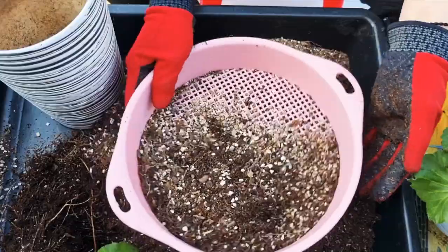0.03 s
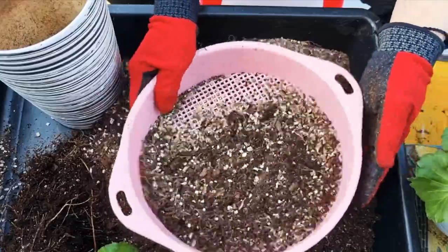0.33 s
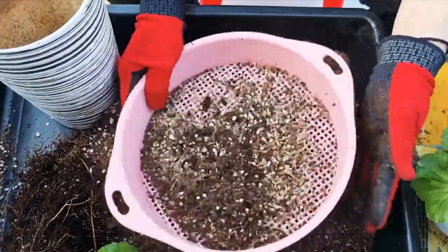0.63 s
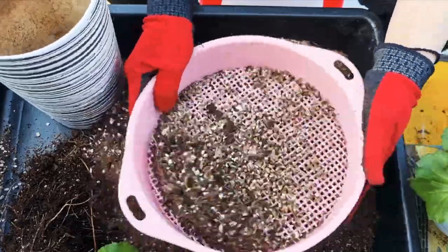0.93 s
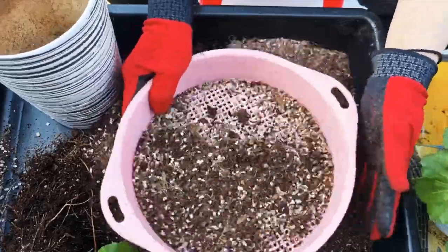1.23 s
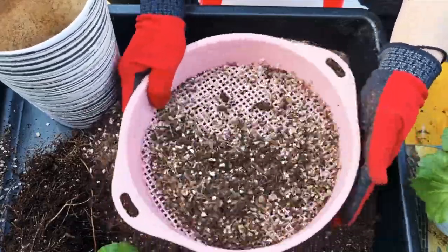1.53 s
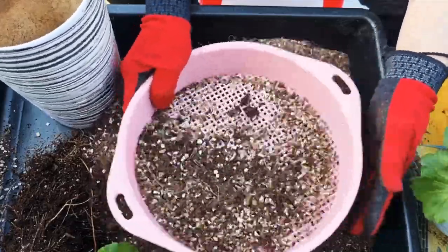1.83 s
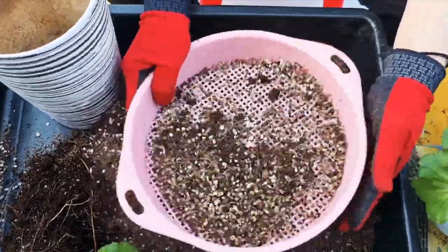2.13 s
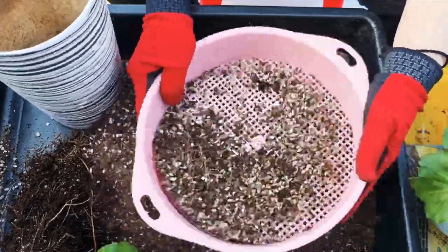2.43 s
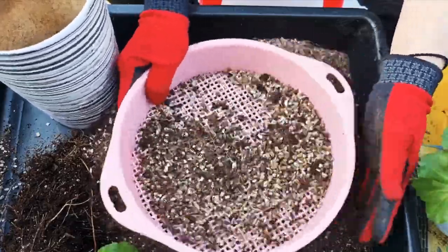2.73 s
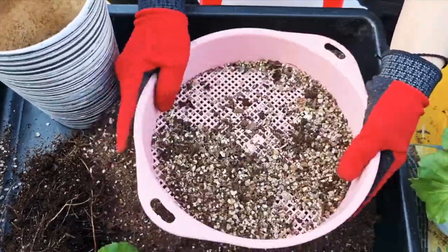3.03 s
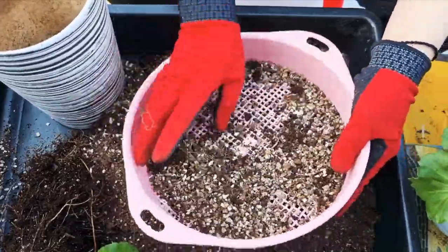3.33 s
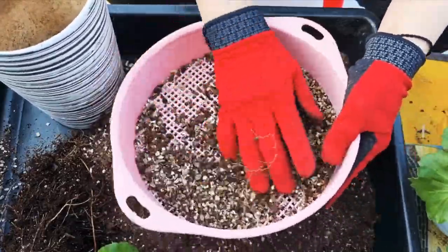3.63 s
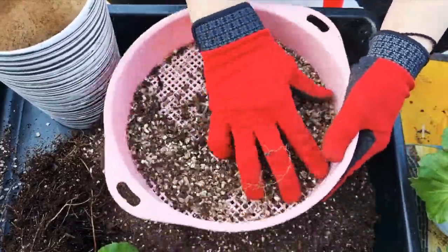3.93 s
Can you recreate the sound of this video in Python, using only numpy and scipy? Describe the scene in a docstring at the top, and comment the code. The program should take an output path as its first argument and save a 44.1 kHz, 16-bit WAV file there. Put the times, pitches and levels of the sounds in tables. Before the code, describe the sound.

Gritty soil rattles and hisses in a plastic sieve, shaken close by in rapid pulses with sharp ticks and soft knocks. The shaking stops and a gloved hand quietly stirs the soil, over a low rumble and distant engine.

```python
"""Sieving gritty soil

Potting soil is shaken in a plastic sieve over a tray, close by. Each stroke throws grit across the mesh
in surges of tiny impacts that excite the modes of the plastic, and the sieve knocks softly in the hands.
The shaking stops and a gloved hand stirs the soil; a distant engine drones under low rumble."""
import sys
import numpy as np
from scipy import signal
from scipy.fft import rfft, irfft
from scipy.io import wavfile
from scipy.ndimage import uniform_filter1d

SR = 44100
rng = np.random.default_rng(int(sys.argv[2]) if len(sys.argv) > 2 else 0)


def wav_out(sig):
    """Save sig, one row per channel (or a flat mono array), as 16-bit PCM at SR to the path in sys.argv[1]."""
    wavfile.write(sys.argv[1], SR, np.round(np.clip(np.atleast_2d(sig).T, -1, 1) * 32767).astype(np.int16))


N = 176400

# surges of grit across the mesh (start [s], length [s], level [dB], treble tilt [dB])
GRIT_SURGES = [(.015, 0.048, -54.5, -4), (.138, 0.071, -36.5, -1), (.314, 0.028, -38.5, -0.5),
               (.396, 0.029, -41, -2.5), (.472, 0.059, -37.5, 1), (.562, 0.077, -36.5, 0.5),
               (.664, 0.016, -40, 4), (.758, 0.06, -34.5, 0), (.828, 0.05, -45.5, 3.5),
               (.879, 0.012, -46.5, 5), (.929, 0.05, -36.5, 0.5), (.983, 0.082, -35.5, 1),
               (1.118, 0.073, -35.5, 3.5), (1.236, 0.04, -38, 0), (1.296, .014, -36.5, 1),
               (1.31, 0.017, -32, 2), (1.342, 0.0092, -32.5, 2), (1.42, 0.075, -39, 0),
               (1.493, 0.03, -34, 0.5), (1.543, 0.012, -30, -0.5), (1.603, 0.029, -39.5, 2.5),
               (1.703, .028, -31, 2), (1.743, 0.022, -30, 0.5), (1.793, 0.049, -36.5, 0.5),
               (1.88, 0.053, -34, 0), (1.934, 0.017, -30.5, 1), (2.0, 0.029, -43, -1.5),
               (2.066, .014, -39.5, 4.5), (2.081, 0.021, -32, 3.5), (2.124, 0.02, -28.5, 0),
               (2.188, 0.015, -32.5, 0), (2.214, 0.016, -35.5, 1), (2.264, 0.036, -30, 1.5),
               (2.314, 0.031, -31.5, 0), (2.37, 0.073, -39.5, 2), (2.457, 0.042, -31.5, 2),
               (2.511, 0.021, -29.5, 1), (2.548, 0.08, -37, 0), (2.652, 0.038, -38, 0),
               (2.69, 0.02, -32.5, 0.5), (2.778, 0.073, -48.5, -1), (2.857, 0.043, -30.5, 3.5),
               (2.903, 0.041, -29.5, -0.5), (2.958, 0.064, -45.5, 1)]
# grit trickling between surges (time [s], level [dB])
GRIT_TRICKLE = [(0, -52.5), (.13, -51), (.22, -46), (.28, -48), (.35, -39.5), (.72, -44), (1.1, -37),
                (1.39, -43), (1.68, -42.5), (2.3, -39), (2.68, -39.5), (2.759, -46), (3.0, -41.5),
                (3.08, -61.5), (3.2, -79), (3.901, -67.5), (4, -52)]
# spectrum of coarse grit on the mesh (frequency [Hz], level [dB])
COARSE_SPECTRUM = [(200, -19.5), (600, -19.5), (1000, -12.5), (1600, -8.5), (2000, -6.5), (3100, 0),
                   (3900, -2), (5200, -2.5), (8000, -14.5), (16000, -20)]
# resonances of the plastic sieve (frequency [Hz], width [Hz], gain [dB])
PLASTIC_MODES = [(1339, 98, 8.5), (1510, 80, -1.5), (1870, 160, 6.5), (2057, 176, 4.5), (2345, 130, 5),
                 (2852, 31, 10.5), (3030, 30, 5), (3300, 240, 3.5)]
# spectrum of fine grit (frequency [Hz], level [dB])
FINE_SPECTRUM = [(1000, -26.5), (2500, 1), (4000, -4), (5200, -1), (6800, -1.5), (8000, -0.5), (9600, -1),
                 (11500, 0), (13500, 2), (14500, -0.5), (16000, -5.5)]
# bright bands of fine grit (frequency [Hz], width [Hz], gain [dB])
FINE_BANDS = [(8830, 780, 4), (13100, 300, 0.5)]


def sieving():
    """Impact excitation: coarse grit rings the modes of the sieve; fine grit ticks against itself."""
    trickle = undb(np.interp(seconds(), *np.array(GRIT_TRICKLE).T))
    clumps = undb(0.74 * walk(130))
    coarse_flow, fine_flow = clumps * np.hypot(flow(GRIT_SURGES, attack_s=.006), trickle)
    coarse = grains(coarse_flow, rate_hz=5000, spread_db=1, ring_s=.00008, crowding=.6)
    fine = grains(fine_flow, rate_hz=6000, spread_db=0, ring_s=.00007, crowding=.6)
    rattle = undb(-3) * colour(coarse, COARSE_SPECTRUM, PLASTIC_MODES)
    return rattle + undb(-1.5) * colour(fine, FINE_SPECTRUM, FINE_BANDS)


# single large grains striking the plastic (time [s], level [dB], decay time [s])
GRAIN_STRIKES = [(.152, -41, 0.0013), (.32, -34.5, .0015), (0.785, -31, .001), (1.319, -19.5, 0.0024),
                 (1.546, -22.5, 0.0024), (1.707, -29, 0.0018), (2.087, -29, .003), (2.144, -18.5, .0008),
                 (2.178, -24, .0006), (2.198, -24, .0025), (2.414, -29, .002), (2.522, -21, 0.0018),
                 (2.863, -28.5, 0.0016), (2.947, -18, 0.00058), (3.016, -35.5, 0.00081), (3.232, -56, .001),
                 (3.424, -45, .0015), (3.433, -50, .002), (3.488, -53.5, .001), (3.809, -48, .002),
                 (3.927, -45, .003)]
# spectrum of a strike (frequency [Hz], level [dB])
STRIKE_SPECTRUM = [(300, -33), (1200, -8.5), (2800, 2), (5000, -5), (7000, 4), (9000, 0), (16000, 0)]


def ticks():
    """Impulse response: a large grain delivers a brief broadband snap that rings the plastic."""
    size = 1024
    out = np.zeros((2, N + size))
    for start, db, decay_s in GRAIN_STRIKES:
        i = int(start * SR)
        fade = np.exp(-np.arange(size) / SR / decay_s)
        out[:, i:i + size] += undb(db) * rng.standard_normal((2, size)) * fade
    return colour(out[:, :N], STRIKE_SPECTRUM, PLASTIC_MODES)


# bumps of the sieve in the hands (time [s], level [dB], centre frequency [Hz])
SIEVE_KNOCKS = [(.611, -41, 566), (.719, -41, 384), (.787, -36, 440), (.888, -40, 402), (.98, -39.5, 398),
                (1.11, -35.5, 460), (1.156, -36, 510), (1.172, -38.5, 393), (1.335, -33, 503),
                (1.512, -40, 400), (1.537, -43, 550), (1.638, -46, 450), (1.741, -40.5, 630),
                (1.839, -39, 430), (1.927, -35, 407), (2.084, -39, 450), (2.314, -36, 417),
                (2.505, -38, 650), (2.525, -56, 500), (2.897, -35, 663)]


def knocks():
    """Damped vibration: the loaded sieve bumps as a stroke turns, a hollow tock over a low thud."""
    size, width_oct, tock_decay_s = 4096, 0.76, 0.0057
    thud_hz, thud_decay_s = 123, .011
    out = np.zeros((2, N + size))
    t, f = np.arange(size) / SR, np.arange(1, size // 2 + 2) * SR / size
    for start, db, hz in SIEVE_KNOCKS:
        band = np.exp(-(np.log2(f / hz) / width_oct) ** 2 / 2)
        shared, left, right = irfft(band * np.exp(2j * np.pi * rng.random((3, len(f)))), size)
        fade = np.exp(-t / tock_decay_s) * (1 - np.exp(-t / 0.00025))
        tock = unit((shared + 0.71 * np.array([left, right])) * fade) * np.sqrt(np.mean(fade ** 2))
        detune = np.exp(0.25 * rng.standard_normal())
        thud = np.sin(2 * np.pi * thud_hz * detune * t) * np.exp(-t / thud_decay_s)
        i = int(start * SR)
        out[:, i:i + size] += undb(db) * (tock + undb(-2.5) * thud)
    return out[:, :N]


# strokes of the glove through the soil (start [s], length [s], level [dB], treble tilt [dB])
GLOVE_STROKES = [(3.07, 0.073, -64.5, -4.5), (3.285, 0.035, -56, -4), (3.311, 0.04, -43, -1),
                 (3.34, 0.019, -42.5, 0.5), (3.419, 0.011, -50.5, 0), (3.455, 0.17, -59.5, 2.5),
                 (3.558, 0.038, -52.5, 1.5), (3.61, 0.046, -55, -3), (3.655, .045, -50, 0),
                 (3.745, 0.026, -66, 5), (3.921, 0.049, -48.5, -1.5)]
# spectra of coarse and of fine grit under the glove (frequency [Hz], level [dB])
STIRRED_COARSE = [(200, -6), (700, -10), (1200, -12), (2000, -8.5), (3100, -2), (4200, -10.5), (6500, -14),
                  (16000, -30)]
STIRRED_FINE = [(1000, -34), (3000, 0), (5000, 9), (7000, 3), (8800, 7.5), (11000, 0.5), (13000, 2.5),
                (16000, -3)]
# spectrum of the rubbed sieve (frequency [Hz], level [dB])
RUB_SPECTRUM = [(1000, -38), (2000, -17), (2400, 5), (2900, -15), (6000, -40)]
# resonance of the rubbed sieve (frequency [Hz], width [Hz], gain [dB])
RUB_MODE = [(2410, 70, 24)]


def stirring():
    """Friction: the glove drags soil over the mesh with a soft crunch, and the sieve sings faintly."""
    coarse_flow, fine_flow = flow(GLOVE_STROKES, attack_s=0.0089)
    coarse = grains(coarse_flow, rate_hz=3300, spread_db=2.5, ring_s=.0001, crowding=.6)
    fine = grains(fine_flow, rate_hz=4600, spread_db=2, ring_s=.00006, crowding=.7)
    crunch = undb(-0.8) * colour(coarse, STIRRED_COARSE, PLASTIC_MODES)
    singing = undb(-16) * colour(coarse, RUB_SPECTRUM, RUB_MODE)
    return crunch + singing + undb(-3) * colour(fine, STIRRED_FINE)


def flow(pushes, attack_s):
    """Incoherent addition: pushes sum in power, giving amplitude envelopes for coarse and fine grit."""
    release_s, settle_s, settle_share = 0.015, 0.023, 0.083
    t, power = seconds()[::20], 0
    for start, length, db, tilt_db in pushes:
        after = np.maximum(t - start - length, 0)
        rise = (1 + np.tanh((t - start - attack_s / 2) / attack_s)) / 2
        fall = (1 - settle_share) * np.exp(-after / release_s) + settle_share * np.exp(-after / settle_s)
        power = power + np.outer(undb([db - tilt_db, db + tilt_db]), rise * fall) ** 2
    return np.array([np.interp(seconds(), t, envelope) for envelope in np.sqrt(power)])


def grains(level, rate_hz, spread_db, ring_s, crowding):
    """Shot noise: random impacts ring as damped sinusoids; a stronger flow brings more and harder ones."""
    count, k = 60000, np.arange(64)
    left_lead_s, lag_spread_s, pan_spread_db = .00011, .00012, 4.5
    when, chance, pitch, phase = rng.random((4, count))
    lag, pan, ring = rng.standard_normal((3, count))
    at = (when * (N - 1)).astype(int)
    odds = np.clip(rate_hz * N / SR / count * (level[at] / level.max()) ** crowding, 1e-4, 1)
    hardness = unit(undb(spread_db * np.minimum(rng.exponential(size=count), 4.5)))
    strength = hardness * level[at] * np.sqrt(N / count / odds)  # the rms follows the level
    hits = chance < odds
    fade = np.exp(-k / (SR * ring_s * np.exp(ring[hits, None] / 2)))
    pings = fade * np.cos(2 * np.pi * (pitch[hits, None] * k / 2 + phase[hits, None]))
    pings *= (strength[hits] / np.sqrt(np.sum(pings ** 2, axis=1)))[:, None]
    out = []
    for side in (1, -1):
        arrival = at[hits] + np.round(side * (lag[hits] * lag_spread_s - left_lead_s) * SR / 2).astype(int)
        panned = pings * undb(side * pan_spread_db * pan[hits, None] / 2)
        out.append(np.bincount(np.maximum(arrival[:, None] + k, 0).ravel(), panned.ravel(), N)[:N])
    return np.array(out)


def reflections(x):
    """Reverberation: quick tray echoes and a faint room tail vary with where each grain lands."""
    tray, room = (.006, -4), (.028, -10)  # (decay time [s], level [dB])
    t = np.arange(SR // 5) / SR
    places = np.array([walk(300) for _ in range(8)])
    places /= np.sqrt(np.sum(places ** 2, axis=0))
    power = sum(undb(db) ** 2 * np.exp(-2 * t / decay_s) * 2 / (decay_s * SR)
                for decay_s, db in (tray, room))
    responses = np.sqrt(power) * rng.standard_normal((len(places), 2, len(t)))
    return x + sum(signal.oaconvolve(x * place, response, axes=1)[:, :N]
                   for place, response in zip(places, responses))


# partials of the distant engine (start [s], end [s], frequency [Hz], level [dB])
ENGINE_PARTIALS = [(.03, .8, 75.4, -43.5), (0, .85, 135, -58), (0, .4, 275, -65), (1.3, 3.15, 49, -54),
                   (2.3, 3.15, 98, -57), (3.15, 3.4, 98, -50), (3.48, 3.62, 75, -51), (3.58, 3.77, 97, -49),
                   (2.4, 2.8, 344.5, -66), (3.12, 3.8, 344.5, -62.5), (3.0, 3.85, 247.5, -64)]


def engine():
    """Frequency and amplitude modulation: the partials of a distant drone waver slowly."""
    fade_s, waver_hz, waver_db = .1, 1.3, 2
    t, out = seconds(), 0
    for start, end, hz, db in ENGINE_PARTIALS:
        gate = np.clip(np.minimum(t - start, end - t) / fade_s + .5, 0, 1)
        phase = 2 * np.pi * np.cumsum(hz + waver_hz * walk(9)) / SR
        out = out + np.sqrt(2) * gate * undb(db + waver_db * walk(12)) * np.sin(phase)
    return out


# spectrum of the rumble and the air above it (frequency [Hz], level [dB])
RUMBLE_SPECTRUM = [(18, -8.5), (30, -18.5), (46, 7.5), (65, 4.5), (95, 3.5), (125, -2), (180, -6.5),
                   (260, -13), (400, -13), (600, -16), (1180, -21), (1750, -27.5), (3000, -27.5),
                   (5000, -45), (15000, -60)]
# narrow peaks and dips in that spectrum (frequency [Hz], width [Hz], gain [dB])
AIR_BANDS = [(175, 36, 3), (373, 8.3, -9), (600, 10, -0.5), (2380, 54, 6.5)]
# stereo width of the rumble (frequency [Hz], side relative to mid [dB])
RUMBLE_WIDTH = [(30, -14), (80, -21), (160, -13.5), (300, -2), (700, 2.5), (15000, -4)]
# slow drift of the rumble (time [s], level [dB])
RUMBLE_ENVELOPE = [(0, -48), (.8, -46), (1.5, -47), (2.4, -46), (3.1, -46.5), (3.7, -45.5), (4, -45.5)]


def rumble():
    """Interaural coherence: the background noise is alike in both ears in the bass and wider above."""
    mid, side = colour(rng.standard_normal((2, N)), RUMBLE_SPECTRUM, AIR_BANDS)
    side_db = np.interp(np.arange(N // 2 + 1) * SR / N, *np.array(RUMBLE_WIDTH).T)
    side = irfft(rfft(side) * undb(side_db), N)
    level = undb(np.interp(seconds(), *np.array(RUMBLE_ENVELOPE).T))
    return (mid + np.array([side, -side])) * level


def colour(x, points, modes=()):
    """Minimum-phase filter: a spectrum with resonances on top, keeping the power of white noise."""
    f = np.maximum(np.arange(N // 2 + 1) * SR / N, 1)
    hz, db = np.array(points, float).T
    curve = np.interp(np.log(f), np.log(hz), db)
    for centre, width, gain_db in modes:
        curve = curve + gain_db / (1 + (2 * (f - centre) / width) ** 2)
    cepstrum = irfft(np.log(unit(undb(curve))), N)
    cepstrum[1:N // 2] *= 2  # folding the cepstrum makes the filter causal
    cepstrum[N // 2 + 1:] = 0
    return irfft(rfft(x) * np.exp(rfft(cepstrum)), N)


def walk(rate_hz):
    """Low-pass noise: smoothed random steps with a spread near 1."""
    k = int(SR / rate_hz)
    steps = np.repeat(rng.standard_normal(N // 100)[:N // k + 1], k)
    return 1.3 * uniform_filter1d(uniform_filter1d(steps, k), k)[:N]


def undb(db):
    """Decibels to amplitude ratio."""
    return 10 ** (np.asarray(db) / 20)


def unit(x):
    """Normalisation to rms 1."""
    return x / np.sqrt(np.mean(x ** 2))


def seconds():
    """Uniform sampling: the time of every sample."""
    return np.arange(N) / SR


def scene():
    """Superposition: grit and its reflections add to the knocks, the rumble and the engine."""
    return reflections(sieving() + stirring() + ticks()) + knocks() + rumble() + engine()


def record(dry):
    """Band limiting: a steep elliptic low-pass removes the highest treble."""
    cutoff_hz = 16000
    return signal.sosfilt(signal.ellip(10, .2, 80, cutoff_hz, fs=SR, output="sos"), dry)


dry = scene()
out = record(dry)
wav_out(out)
```